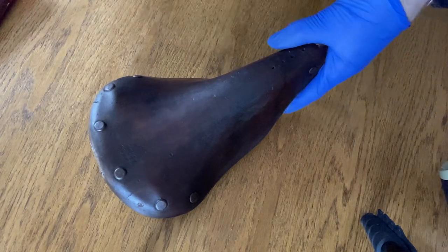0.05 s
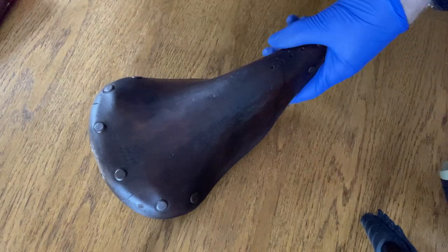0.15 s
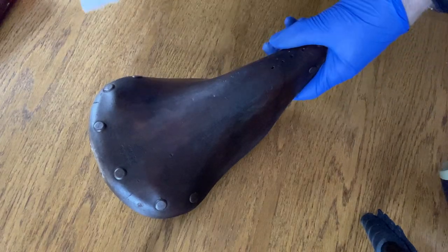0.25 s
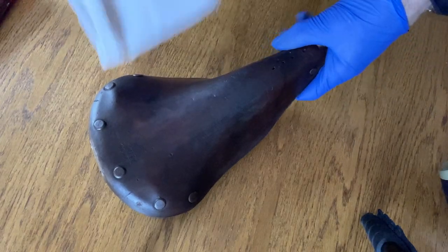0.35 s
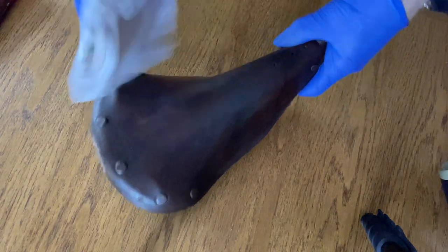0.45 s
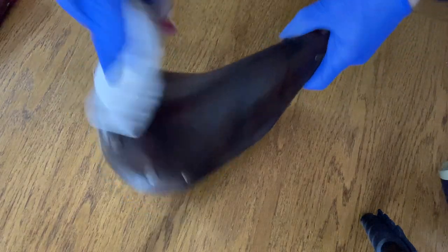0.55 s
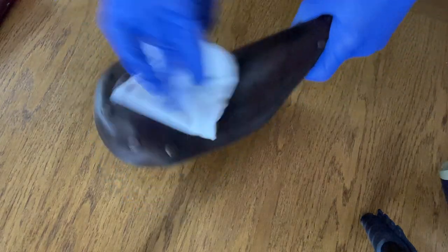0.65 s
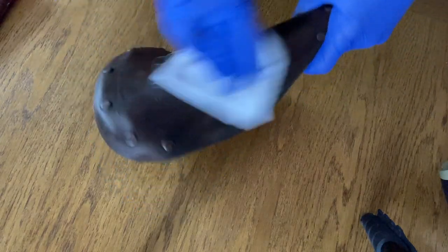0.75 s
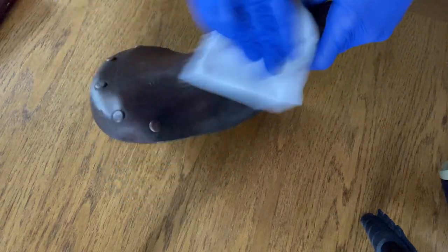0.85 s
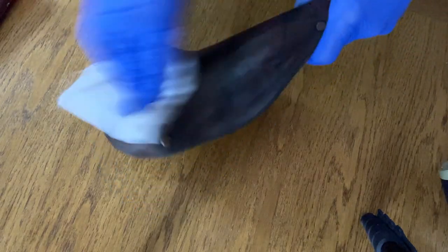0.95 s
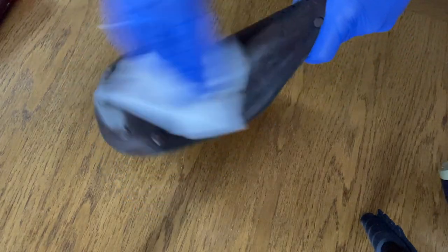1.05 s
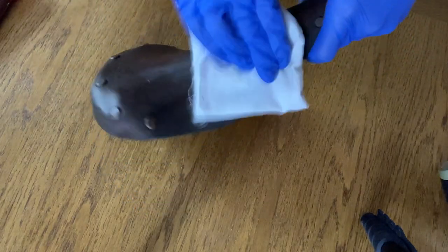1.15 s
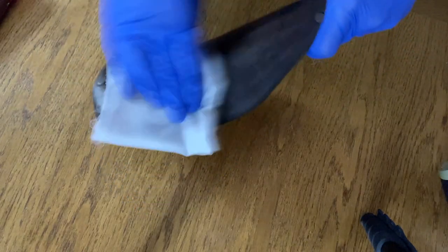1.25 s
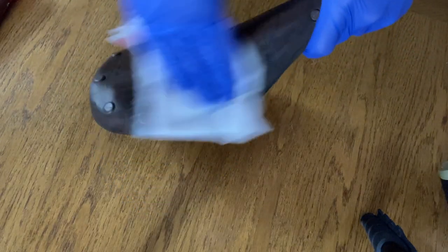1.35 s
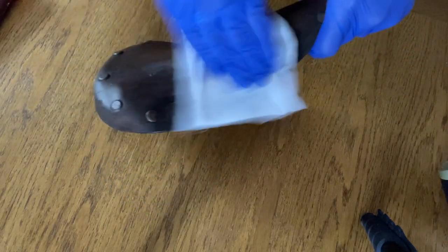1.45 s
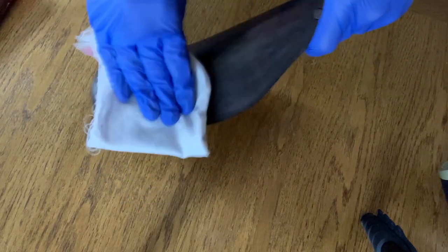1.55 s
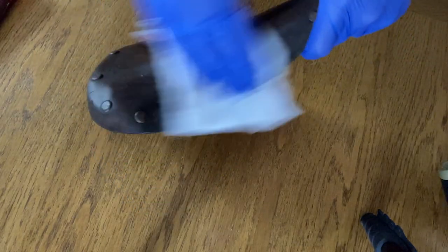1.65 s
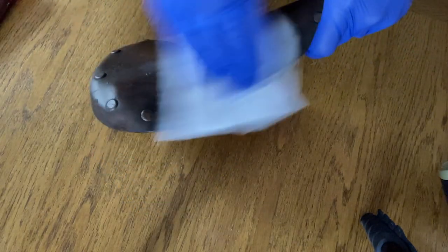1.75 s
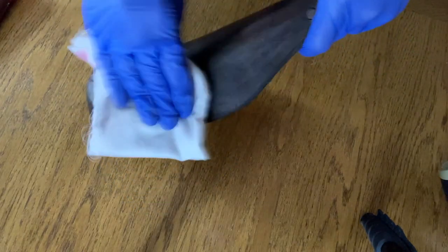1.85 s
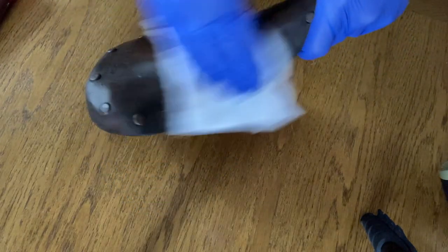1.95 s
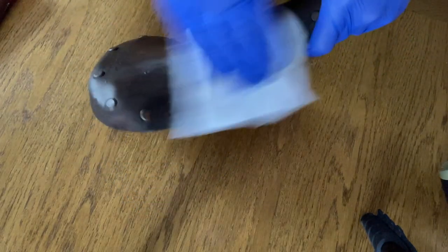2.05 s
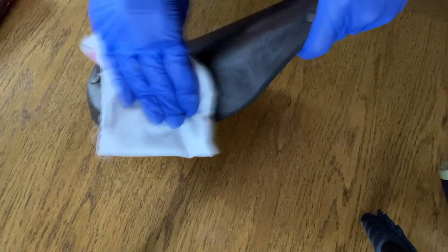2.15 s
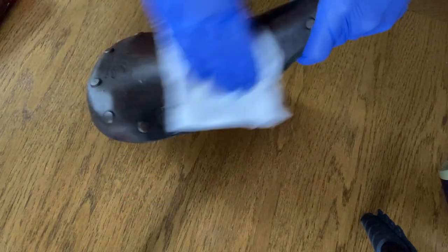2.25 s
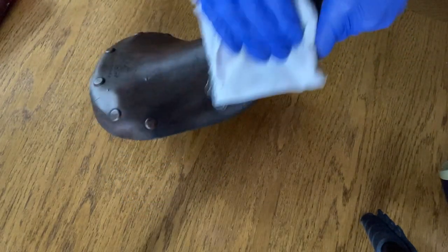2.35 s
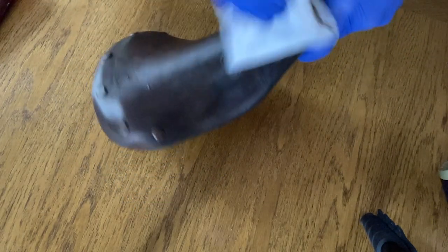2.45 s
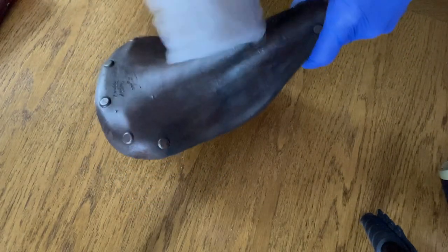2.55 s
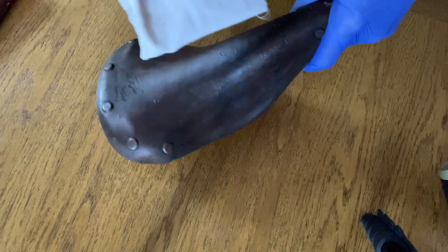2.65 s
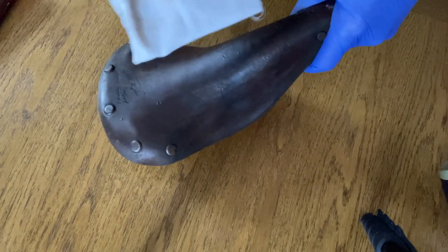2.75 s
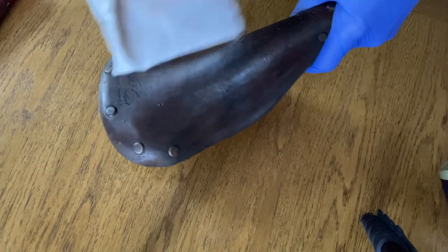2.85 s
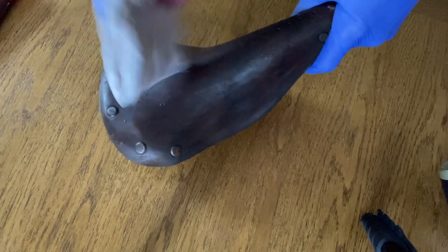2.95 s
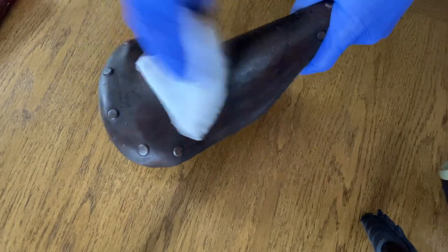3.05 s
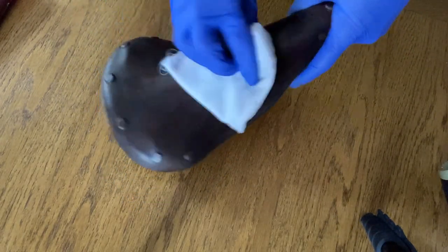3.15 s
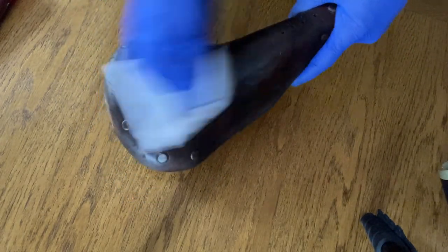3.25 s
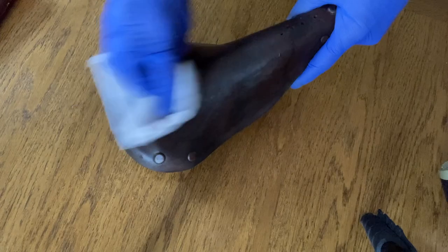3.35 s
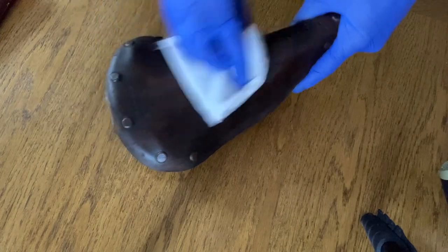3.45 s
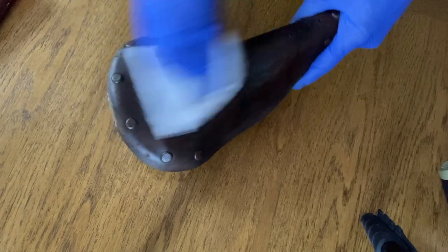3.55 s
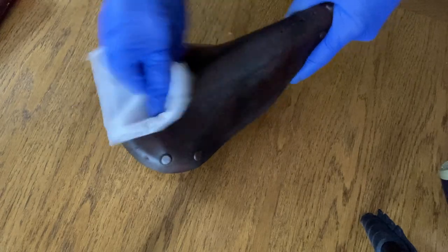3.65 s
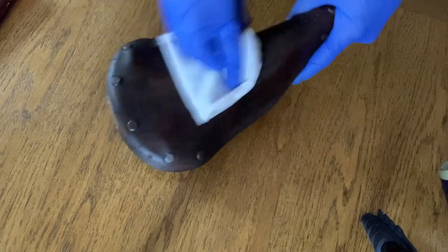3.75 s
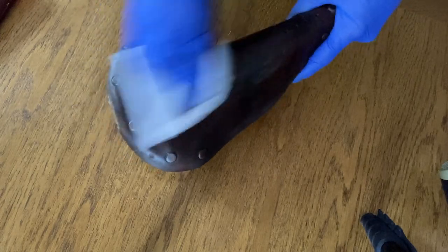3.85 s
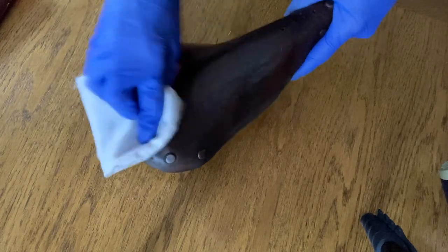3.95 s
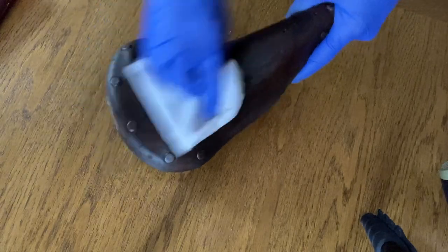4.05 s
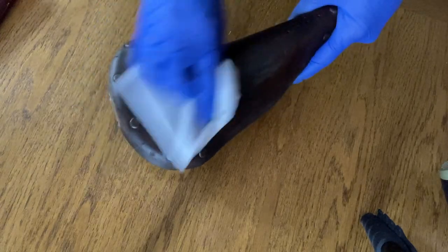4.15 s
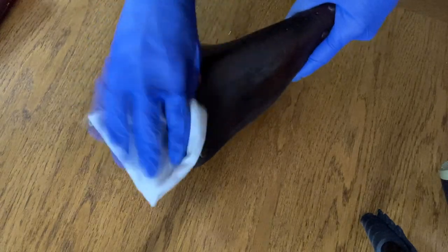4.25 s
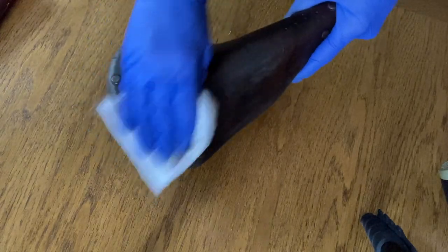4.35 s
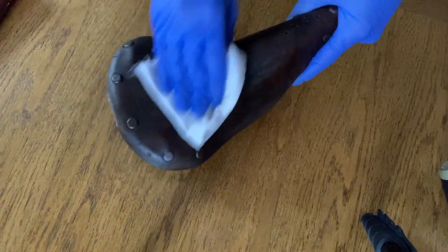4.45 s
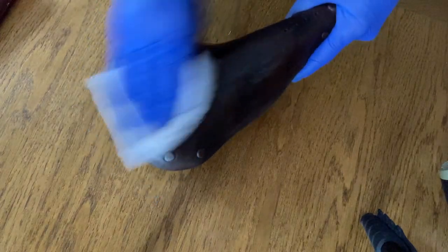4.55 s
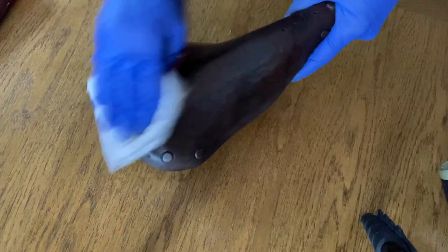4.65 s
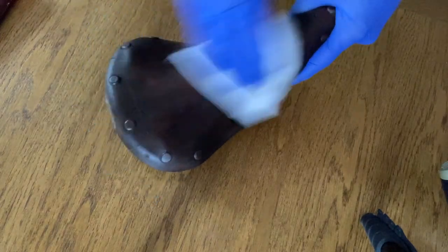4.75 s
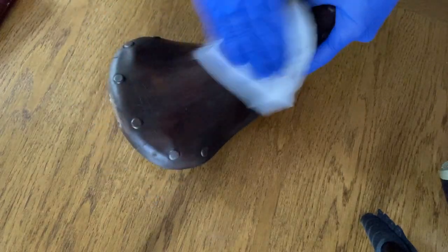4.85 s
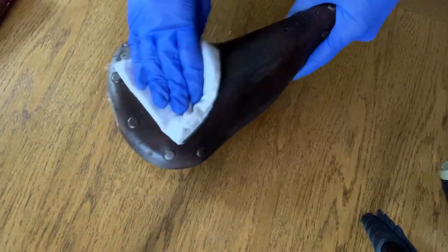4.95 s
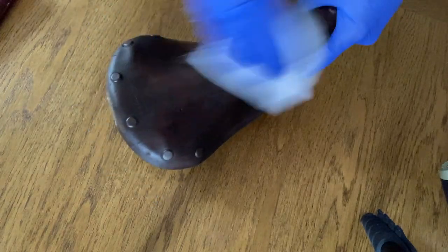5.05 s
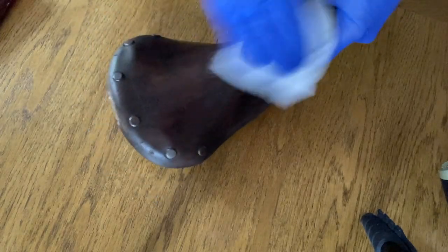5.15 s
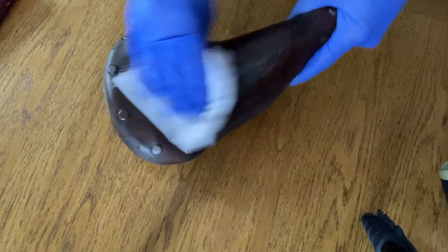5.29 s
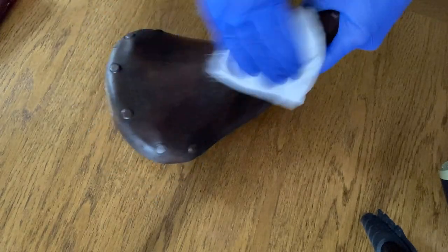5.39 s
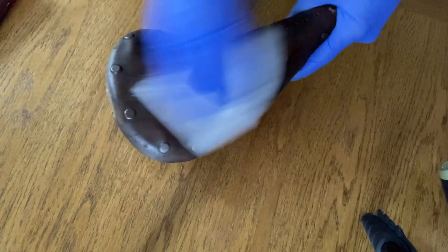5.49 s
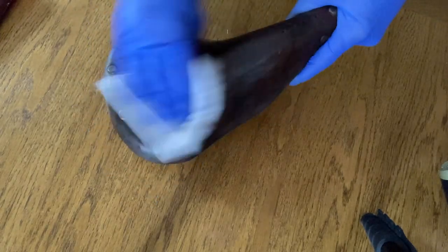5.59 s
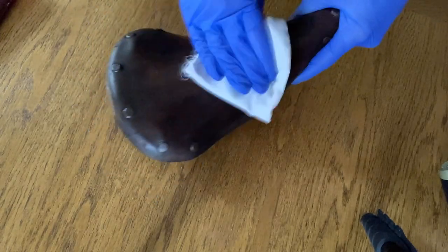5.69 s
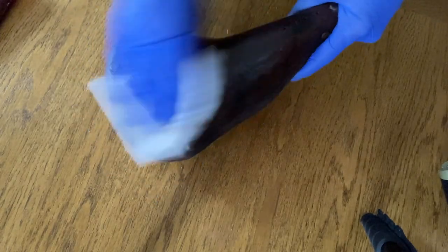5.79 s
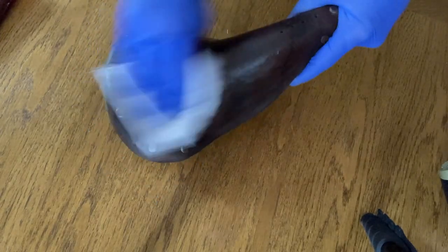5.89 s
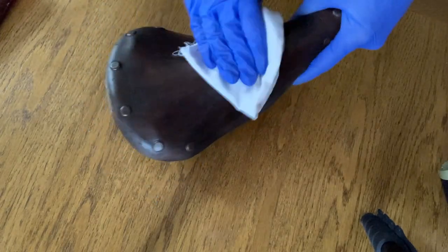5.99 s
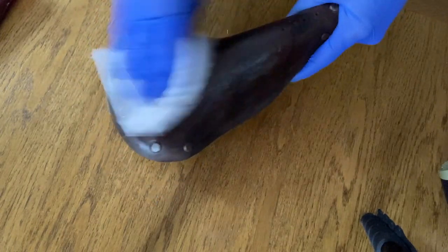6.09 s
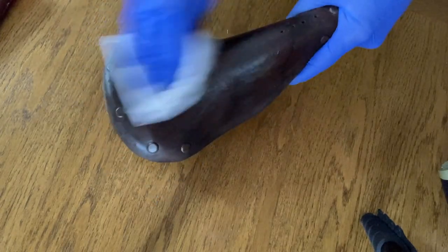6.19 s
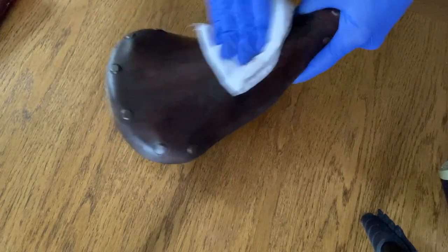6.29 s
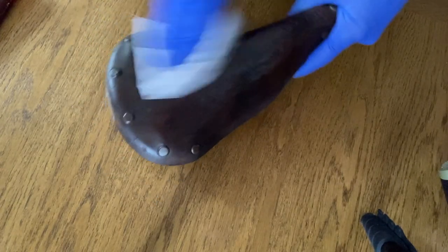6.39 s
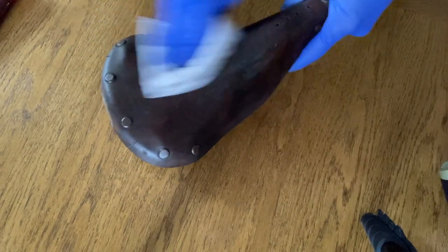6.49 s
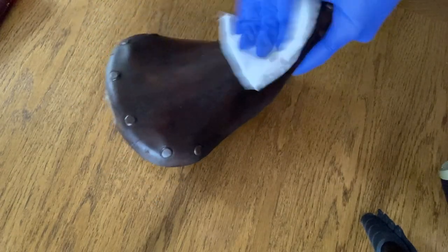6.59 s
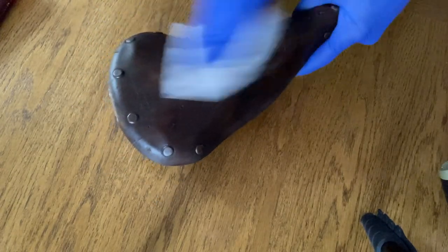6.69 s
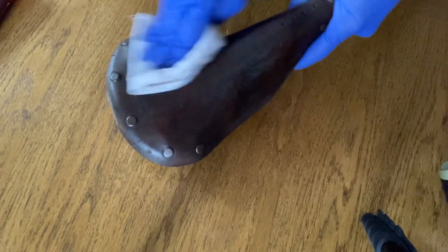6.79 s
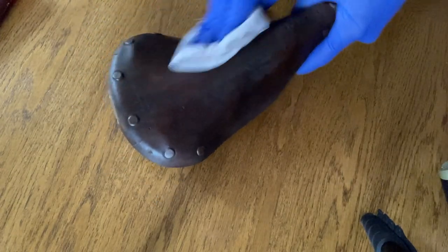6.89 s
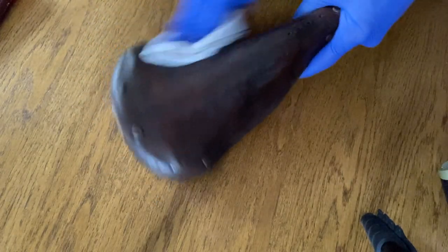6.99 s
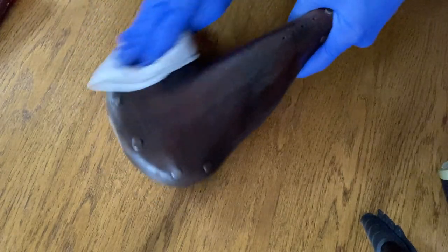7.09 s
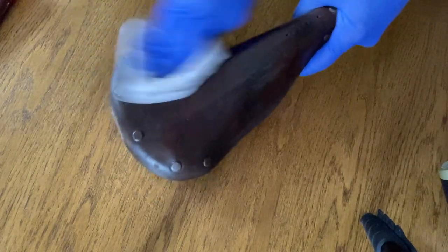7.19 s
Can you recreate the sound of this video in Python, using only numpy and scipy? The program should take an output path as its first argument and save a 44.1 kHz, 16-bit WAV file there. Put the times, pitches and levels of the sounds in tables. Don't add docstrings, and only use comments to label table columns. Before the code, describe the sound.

A stiff leather bicycle saddle is handled on a wooden table, then buffed with dry cloth. Quick swishing strokes run in two passes split by a brief lull, the second firmer, with tiny squeaky zips. Low woody bumps, hollow shell taps and occasional sharp metallic ticks punctuate the rubbing. Close stereo microphone, short room reflections, faint room air.

```python
import sys
import numpy as np
from scipy import signal
from scipy.fft import rfft, irfft, next_fast_len
from scipy.io import wavfile
from scipy.ndimage import uniform_filter1d

SR = 44100
rng = np.random.default_rng(int(sys.argv[2]) if len(sys.argv) > 2 else 0)


def invert_db(level):
    return 10 ** (np.asarray(level, dtype=float) / 20)


def unload_audio(sound):
    columns = np.transpose(np.atleast_2d(sound))
    steps = np.round(np.clip(columns, -1, 1) * 32767)
    wavfile.write(sys.argv[1], SR, steps.astype(np.int16))


N = 318843
TOP_HZ = 15790


def unit(x):
    return x / np.sqrt(np.mean(x ** 2) + 1e-20)


def along(points, hz):
    point_hz, value = np.transpose(points)
    return np.interp(np.log(hz + 1), np.log(point_hz + 1), value)


def curves(rows):
    s, *columns = np.transpose(rows)
    return [np.interp(np.arange(N) / SR, s, column) for column in columns]


def add(track, s, sound):
    track[..., round(s * SR):][..., :sound.shape[-1]] += sound


def filtered(x, response):
    m = next_fast_len(N + SR // 2, True)
    gain = np.asarray(response(np.fft.rfftfreq(m, 1 / SR)), np.complex64)
    return irfft(rfft(np.float32(x), m) * gain, m)[..., :N]


def modes(table):
    def response(f):
        f = np.float32(f)
        total = 0
        for k, (hz, width_hz, db) in enumerate(table):
            damping = np.float32(width_hz) * 1j * f
            strength = np.float32((-1) ** k * invert_db(db) * width_hz)
            total = total + strength * 1j * f / (np.float32(hz * hz) - f * f + damping)
        return total
    return response


def banded(table, low_hz, high_hz):
    return lambda f: modes(table)(f) / (1 + (low_hz / (f + 1)) ** 4) / (1 + (f / high_hz) ** 4)


def ring(x, table):
    total = 0
    for k, (hz, width_hz, db) in enumerate(table):
        b, a = signal.iirpeak(hz, hz / width_hz, SR)
        total = total + (-1) ** k * invert_db(db) * signal.lfilter(b, a, x)
    return total


def blows(times_s, levels_db, contact_s):
    train = np.zeros(N)
    np.add.at(train, np.round(np.asarray(times_s) * SR).astype(int), invert_db(levels_db))
    push = np.sin(np.pi * np.linspace(0, 1, int(contact_s * SR) + 3))
    return signal.fftconvolve(train, push / push.sum())[:N]


def slips(grain_db, patchy_db):
    grains = rng.standard_normal((2, N)) * invert_db(grain_db * rng.standard_normal(N))
    z = signal.stft(np.float32(grains), nperseg=512)[2]
    field = uniform_filter1d(rng.standard_normal(z.shape[1:]), size=5, axis=0)
    field = uniform_filter1d(field, size=6, axis=1)
    return signal.istft(z * np.float32(invert_db(patchy_db * unit(field))), nperseg=512)[1][:, :N]


# (frequency [Hz], correlation [-1..1])
LIKENESS = [(40, -1.64), (90, 0.68), (300, 0.64), (700, 0.17), (1400, 0.73), (3000, 0.035), (5500, 0.87),
            (8000, 1)]


def turn(hz):
    return np.arccos(np.clip(along(LIKENESS, hz), -1, 1)) / 2


def spread(pair, colour):
    def response(hz):
        angle = turn(hz)
        return colour(hz) * (hz < TOP_HZ) * [np.cos(angle), np.sin(angle)]
    mid, side = filtered(pair, response)
    return np.array([mid + side, mid - side])


# (frequency [Hz], density [dB per Hz])
ROOM_AIR = [(15, -31), (30, 8), (60, 17), (130, -4), (250, -18), (450, 4.5), (1500, -48), (15500, -42)]


def air():
    noise = spread(rng.standard_normal((2, N)), lambda hz: invert_db(along(ROOM_AIR, hz)))
    return invert_db(-74) * unit(noise)


# (time [s], force [dB], bearing [dB, mid-board above 0, edge below])
DRAG = [(0, -72, -10.5), (.2, -77.5, -3), (.53, -64, 5.5), (.62, -54.5, 7), (.95, -71, 5), (1.25, -66, 10),
        (1.45, -65.5, 1.5), (2.0, -69, 2), (2.72, -102, -9), (3.05, -76, -8), (3.3, -56, -2),
        (3.55, -69, -1.5), (4.5, -73, 0), (4.9, -59, 1.5), (5.64, -73, -1.5), (6.5, -66, -7),
        (6.93, -64.5, -3.5), (7.0, -57, -3)]
# (frequency [Hz], width [Hz], level [dB])
DEEP = [(134, 5.6, 0), (100, 25, -17)]
MIDDLE = [(162.7, 12.7, -1.5), (197.7, 34.7, 2.5), (227.8, 49, 1.5)]
UPPER = [(276, 28, 1), (337.4, 14.7, 1.5), (415, 27, -6), (532.4, 46, -4.5)]


def drag():
    let_go_db_per_s = -44
    force_db, bearing_db = curves(DRAG)
    after_s = np.clip(np.arange(N) / SR - DRAG[-1][0], 0, None)
    force_db = force_db + let_go_db_per_s * after_s
    deep = spread(invert_db(force_db + bearing_db + 33.5) * unit(slips(3.4, 3.0)), modes(DEEP[:1]))
    shudder = shaking(level_db=-26, t60_s=0.58)
    edge = invert_db(force_db - bearing_db - 2.0) + shudder
    return deep + spread(edge * invert_db(24) * unit(slips(3.5, 3.3)), modes(MIDDLE + UPPER))


# (hand turns [s], fastest [s], fibre hiss [dB], shell over hiss [dB])
FIRST_PASS = [(-.1, 0.0, -61, 1), (0.193, .24, -93.5, 22.5), (.28, 0.37, -70, -4), (0.508, 0.54, -59, -21),
              (.585, .6, -64, -10), (0.642, 0.665, -54.5, -19), (0.697, 0.734, -58.5, -4),
              (0.822, 0.909, -51.5, -4), (0.966, 1.058, -54, -3.5), (1.13, 1.203, -53, 0.5),
              (1.274, 1.34, -54, 1), (1.417, 1.494, -52.5, -2.5), (1.547, 1.604, -54, 2.5),
              (1.704, 1.77, -51, -0.5), (1.837, 1.902, -54, 1), (2.009, 2.073, -51, -0.5),
              (2.134, 2.184, -56, 3.5), (2.353, 2.398, -67, -1.5), (2.68, 2.697, -89, -20),
              (2.79, 3.03, -70, 0)]
SECOND_PASS = [(3.045, 3.07, -62.5, 2), (3.172, 3.213, -52, -0.5), (3.314, 3.414, -54, -2),
               (3.486, 3.534, -50.5, -2), (3.626, 3.712, -52.5, -1.5), (3.777, 3.827, -51.5, -3),
               (3.951, 4.026, -54.5, 2.5), (4.094, 4.187, -54.5, 0.5), (4.256, 4.253, -63, -13),
               (4.311, 4.392, -55, 0.5), (4.487, 4.536, -53.5, -1.5), (4.632, 4.712, -49, -3.5),
               (4.821, 4.88, -49.5, 0.5), (4.954, 5.022, -49.5, -3), (5.113, 5.2, -48.5, -0.5),
               (5.257, 5.33, -51.5, 1), (5.412, 5.494, -49, -3), (5.551, 5.623, -51.5, 1),
               (5.695, 5.766, -49, -4), (5.82, 5.89, -50, 4.5), (5.993, 6.044, -51, -3),
               (6.129, 6.233, -52.5, -3), (6.308, 6.359, -50, -1), (6.43, 6.535, -52, -1),
               (6.612, 6.693, -50.5, -5.5), (6.753, 6.82, -57.5, -1.5), (6.915, 6.987, -56.5, 0.5),
               (7.137, 7.215, -55, 0.5)]
LAST_TURN_S = 7.25


def strokes():
    turn_s, fast_s, hiss_db, shell_db = np.transpose(FIRST_PASS + SECOND_PASS)
    t = np.arange(N) / SR
    knots_s = np.append(np.ravel([turn_s, fast_s], order="F"), LAST_TURN_S)
    swing = np.interp(t, knots_s, np.arange(len(knots_s)) % 2)
    speed = np.sin(np.pi / 2 * swing)
    which = np.searchsorted(turn_s, t, side="right") - 1
    return speed, hiss_db[which], shell_db[which]


# (time [s], pressure [dB], fold tautness [dB])
PRESSURE = [(0, -71, 2), (.17, -76.5, 0), (.26, -83, -7), (.48, -73, -8), (.6, -68.5, -29), (.72, -67, -12),
            (.82, -68.5, -2), (2.1, -65.5, 5.5), (2.4, -69, -0.5), (2.68, -92, -4), (2.98, -80.5, 1),
            (3.08, -66.5, -1), (4.3, -70, -8.5), (4.8, -67, 0), (5.82, -66, 3.5), (6.3, -66, -2),
            (6.9, -65, -4), (7.23, -67, -18)]
# (frequency [Hz], density [dB per Hz])
FIBRES = [(2650, -24), (4500, -1), (5840, -2), (8370, 1.5), (11500, -1), (13400, -1.5), (15200, -4),
          (15800, -10)]
# (frequency [Hz], width [Hz], level [dB])
FOLD = [(3170, 540, -1.5), (3790, 890, 2.5), (4604, 2170, -3)]
SHELL = [(1276, 266, -3), (1719, 144, 2), (2000, 430, -2.5), (2790, 600, -6)]
HOLLOW = [(470, 430, -6.5), (654, 67, -0.5), (723.2, 21.2, 4.5), (807, 136, -1), (1016, 220, -3)]


def cloth():
    speed, hiss_db, shell_db = strokes()
    pressure_db, taut_db = curves(PRESSURE)
    fibre_dome, body_dome = 1.5, 0.95

    def gain(dome, stroke_db, creep_db):
        return speed ** dome * invert_db(hiss_db + stroke_db) + invert_db(pressure_db + creep_db)

    hiss = unit(spread(slips(0.85, 1.3), lambda hz: invert_db(along(FIBRES, hz))))
    hiss = hiss * gain(fibre_dome, 0.1, creep_db=0.5)
    fold = unit(spread(slips(1.3, 2.87), banded(FOLD, low_hz=2400, high_hz=6530)))
    fold = fold * gain(fibre_dome, taut_db - 4, creep_db=3)
    shell = unit(spread(slips(2.7, 2.8), banded(SHELL, low_hz=800, high_hz=3900)))
    shell = shell * gain(body_dome, shell_db - 2.0, creep_db=3.5)
    hollow = unit(spread(slips(3.75, 4.24), banded(HOLLOW, low_hz=424, high_hz=1600)))
    rattle = shaking(level_db=-21.5, t60_s=0.4)
    hollow = hollow * (gain(body_dome, shell_db - 21.5, creep_db=7) + rattle)
    return hiss + fold + shell + hollow


# (time [s], peak [dB], sharpness [dB])
TAPS = [(0.002, -38, -5), (0.413, -51, -4), (0.441, -45, -7.5), (0.462, -44.5, -7), (0.507, -44, -4.5),
        (0.55, -46.5, -11), (0.574, -47.5, -15), (0.604, -47, -15), (0.629, -47, -6), (1.857, -44, -7),
        (2.118, -37.5, -8), (3.126, -40, -9), (3.968, -39, -13), (4.1, -40, -9), (4.488, -49, -4),
        (4.804, -24.5, -17.5), (5.103, -27.5, -17), (5.415, -41.5, -3), (5.815, -44, 2), (6.01, -44, -10),
        (6.155, -53, -5), (6.704, -47, -12), (6.985, -39, -10), (7.028, -38, -12)]


def taps():
    tap_t60_s, snap_t60_s, snap_db, rise_s = 0.034, 0.011, 12, 0.00044
    track, t = np.zeros(N + SR), np.arange(SR // 8) / SR
    for s, db, sharp_db in TAPS:
        tone = np.sin(2 * np.pi * 740 * t) + 0.28 * np.sin(2 * np.pi * 1140 * t)
        tone = tone + invert_db(sharp_db) * np.sin(2 * np.pi * 1700 * t)
        snap = np.convolve(rng.standard_normal(len(t)), np.hanning(9) / 4, "same")
        tone = tone + invert_db(snap_db + sharp_db - 60 * t / snap_t60_s) * snap
        envelope = invert_db(db - 1.5 - 60 * t / tap_t60_s) * (1 - np.exp(-t / rise_s))
        add(track, s, envelope * tone)
    return track[:N]


# (frequency [Hz], t60 [s])
WALLS = [(100, 0.67), (500, 0.25), (3000, 0.14), (12000, 0.056)]


def room(x):
    hz, t, z = signal.stft(rng.standard_normal((2, SR // 2)), SR, nperseg=256)
    decay = invert_db(-60 * t / along(WALLS, hz)[:, None])
    tail = signal.istft(z * decay, SR, nperseg=256)[1]
    tail = tail / np.linalg.norm(tail[0])
    delayed = np.pad(x, (260, 0))[None]
    pair = signal.fftconvolve(delayed, tail, axes=1)[:, :N]
    return spread(pair, lambda hz: hz ** 2 / (hz ** 2 + 170 ** 2))


# (time [s], peak [dB], mid-board [dB], edge [dB], legs [dB])
KNOCKS = [(0.341, -41, -31, -18, -24), (0.571, -48, 8.5, -15, -29), (0.662, -43, 10, -18, -20),
          (1.122, -33.5, 4.5, -13.5, -22), (1.329, -35.5, -34, 2, -16), (1.351, -22.5, -1.5, -20.5, -15),
          (1.613, -41.5, 1, -17, -6), (2.122, -46.5, 1, -8, -23), (2.5, -43, -23, -15, -42),
          (3.076, -28.5, -17, -19, -22), (3.204, -23.5, -31, -1.5, -29), (3.277, -41, -30, -7, -32),
          (3.869, -49.5, -16, -4, -17), (4.101, -50.5, -27, -3.5, -27), (4.272, -36.5, -18, -10, -2),
          (4.56, -48, -7, -28, -8), (4.814, -31.5, 2.5, -0.5, -8), (4.826, -37.5, 7, 2, -22),
          (5.121, -30.5, -12, -1.5, -2), (5.817, -42.5, -3, -1.5, -20), (6.599, -51, 3, -25, -24),
          (6.704, -52.5, -15, 7, -27), (7.01, -36.5, -21, 1, -23), (7.079, -45, -18, 4, -35)]
# (frequency [Hz], width [Hz], level [dB])
THUD = [(50.4, 22, -16), (89, 54, -0.5)]
SHELL_PER_EDGE = 0.43


def knocks():
    broad_per_edge = 0.5
    s, db, deep_db, edge_db, legs_db = np.transpose(KNOCKS)
    thud = ring(blows(s, db + legs_db + 48.5, contact_s=0.005), THUD)
    deep = ring(blows(s, db + deep_db + 59.0, contact_s=0.0039), DEEP)
    middle = ring(blows(s, db + 53.0, contact_s=0.0036), MIDDLE[:1])
    broad = ring(blows(s, db + broad_per_edge * edge_db + 52.0, contact_s=0.0035), MIDDLE[1:])
    upper = ring(blows(s, db + edge_db + 47.5, contact_s=0.0017), UPPER)
    shell = ring(blows(s, db + SHELL_PER_EDGE * edge_db + 27.5, contact_s=0.0005), HOLLOW + SHELL)
    return thud + deep + middle - broad + upper + shell


def shaking(level_db, t60_s):
    s, db, _, edge_db, _ = np.transpose(KNOCKS)
    kick = invert_db(db + SHELL_PER_EDGE * edge_db + level_db)
    kicks = np.bincount(np.round(s * SR).astype(int), kick, N)
    return signal.lfilter([1], [1, -invert_db(-60 / (t60_s * SR))], kicks)


# (time [s], peak [dB], pitch [Hz], t60 [s], crack share [ratio])
CLICKS = [
    (1.351, -40.5, 4040, 0.018, .1),
    (3.0638, -27.5, 5300, 0.0032, 1.3),
    (4.6836, -36.5, 4540, 0.033, .1),
    (5.8148, -29, 5800, 0.0037, 2.3),
    (5.8171, -24.5, 3570, 0.0061, 0.41),
]


def clicks():
    track, t = np.zeros(N + SR), np.arange(SR // 8) / SR
    for s, db, hz, t60_s, crack_share in CLICKS:
        crack = np.diff(uniform_filter1d(rng.standard_normal(len(t) + 1), size=3))
        tick = np.sin(2 * np.pi * hz * t) + crack_share * crack
        add(track, s, invert_db(db - 60 * t / t60_s) * tick)
    return track[:N]


# (time [s], length [s], from [Hz], to [Hz], level [dB])
ZIPS = [(1.555, 0.043, 900, 1384, -55), (1.845, 0.043, 800, 1360, -57.5), (2.245, 0.065, 1001, 454, -62),
        (3.787, 0.046, 900, 2130, -54.5), (3.968, 0.053, 800, 1735, -63), (4.109, 0.089, 996, 2000, -53),
        (4.347, 0.097, 2000, 1848, -50.5), (4.508, .05, 1600, 2000, -51.5), (4.677, 0.025, 1670, 2260, -48),
        (5.427, 0.098, 1600, 2000, -52.5), (5.568, 0.04, 1337, 2830, -52.5),
        (5.706, 0.053, 1016, 2267, -49), (5.739, 0.084, 1703, 2000, -53.5), (6.004, .05, 1207, 2000, -48.5),
        (6.066, 0.047, 1900, 2400, -55), (6.147, 0.038, 915, 2500, -51), (6.31, 0.048, 1087, 2170, -56),
        (6.629, 0.047, 1117, 2107, -51.5), (6.341, 0.045, 3500, 4090, -53), (6.659, 0.044, 3430, 4800, -52),
        (6.773, 0.043, 1393, 1900, -56)]


def zips():
    overtone_db = -13
    track = np.zeros((2, N + SR))
    for s, length_s, from_hz, to_hz, db in ZIPS:
        u = np.linspace(0, 1, int(length_s * SR))
        phase = 2 * np.pi * np.cumsum(from_hz + (to_hz - from_hz) * np.sqrt(u)) / SR
        a, b, c = uniform_filter1d(rng.standard_normal((3, len(u))), size=70, axis=1)
        common = a * (np.sin(phase) + invert_db(overtone_db) * np.sin(2 * phase))
        apart = np.array([b + 0.26 * c, b - 0.2 * c]) * np.cos(phase)
        add(track, s, invert_db(db + 1.5) * np.sin(np.pi * u) * unit(common + apart))
    return track[:, :N]


def scene():
    hits = taps() + knocks() + clicks()
    return air() + drag() + cloth() + hits + invert_db(-7.5) * room(hits) + zips()


def low_pass(x):
    return signal.sosfilt(signal.butter(12, 16690, fs=SR, output="sos"), x)


# (frequency [Hz], left over right [dB])
LEAN = [(40, -9.5), (90, 3.5), (180, -4), (350, 0), (700, -4), (1400, -0.5), (3000, -2), (8000, 1)]


def record(dry):
    def balance(hz):
        return invert_db(along(LEAN, hz) * np.array([[.5], [-.5]])) * (hz < TOP_HZ + 850)
    ports = filtered(dry, balance)
    return low_pass(ports)


dry = scene()
out = record(dry)
unload_audio(out)
```